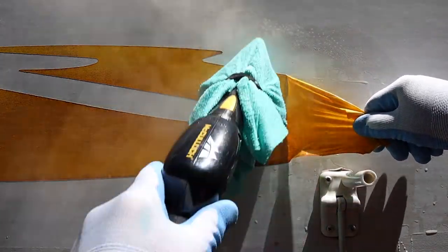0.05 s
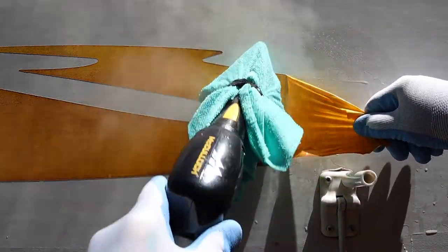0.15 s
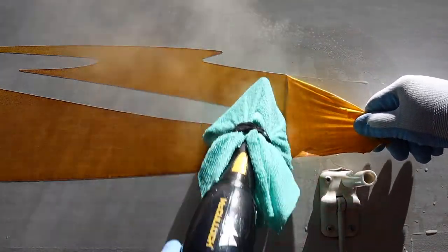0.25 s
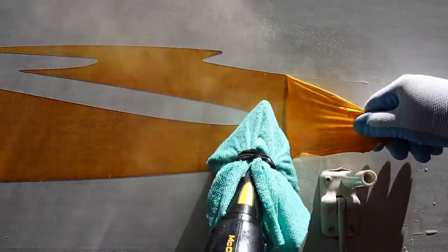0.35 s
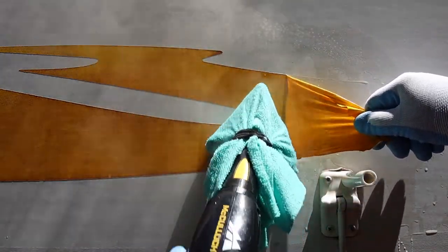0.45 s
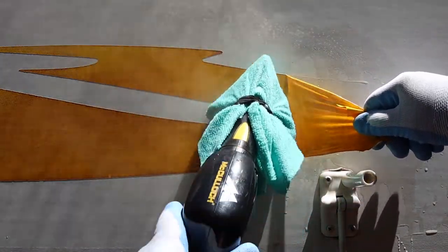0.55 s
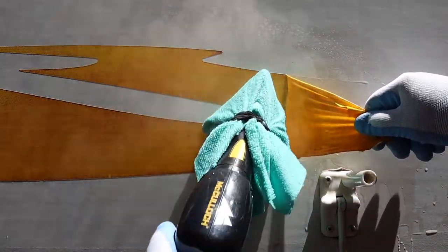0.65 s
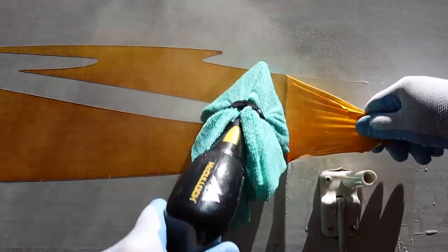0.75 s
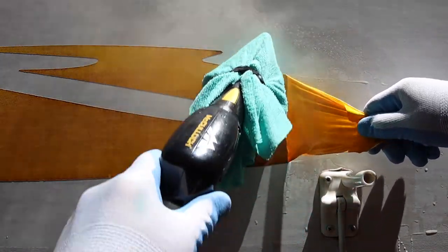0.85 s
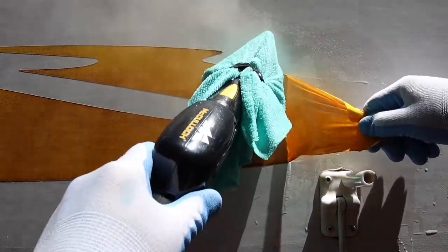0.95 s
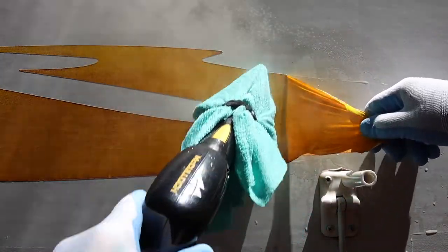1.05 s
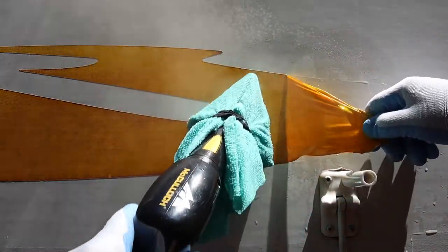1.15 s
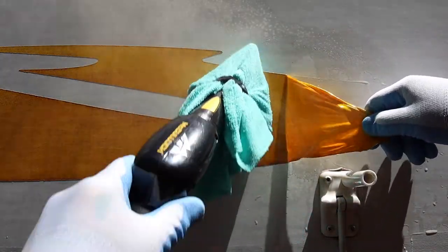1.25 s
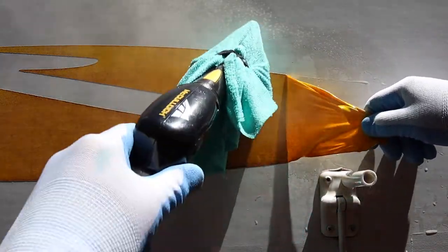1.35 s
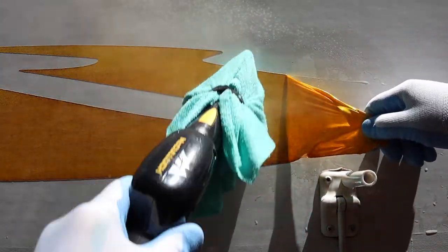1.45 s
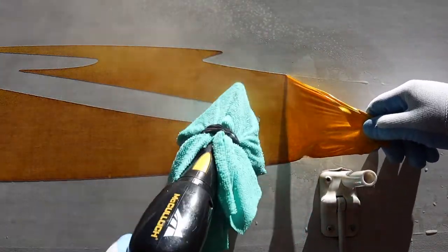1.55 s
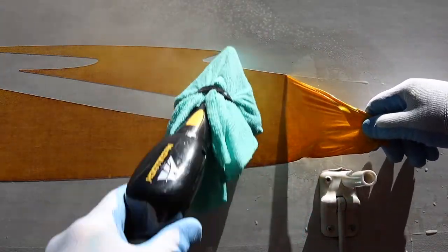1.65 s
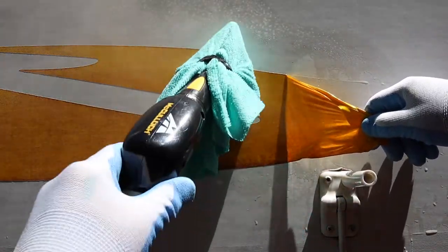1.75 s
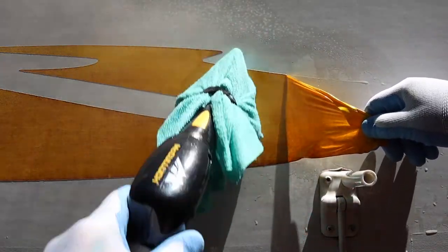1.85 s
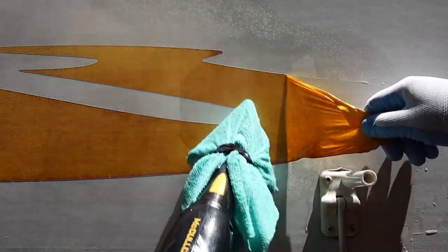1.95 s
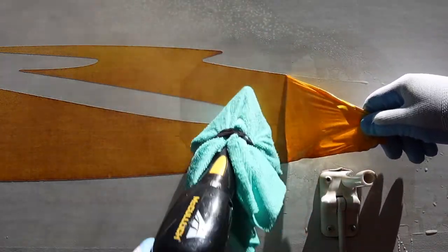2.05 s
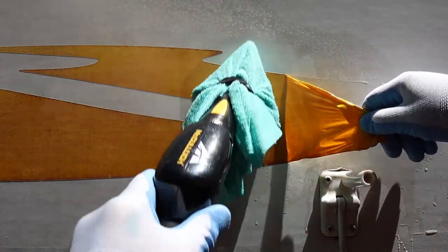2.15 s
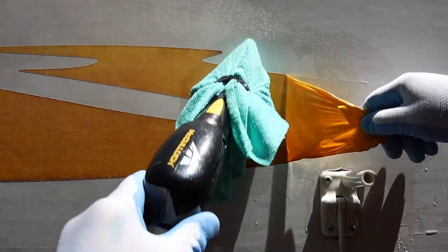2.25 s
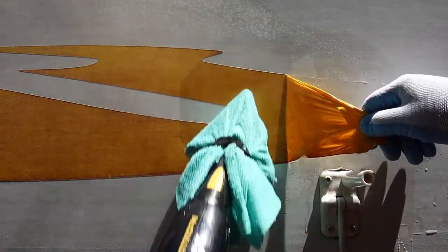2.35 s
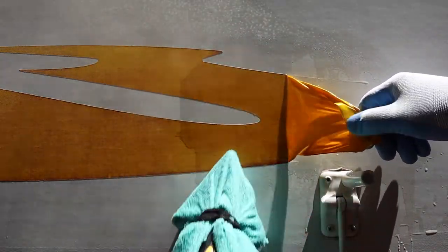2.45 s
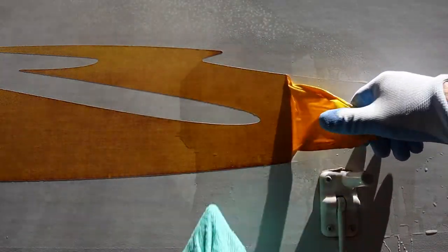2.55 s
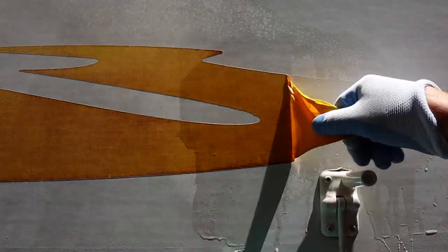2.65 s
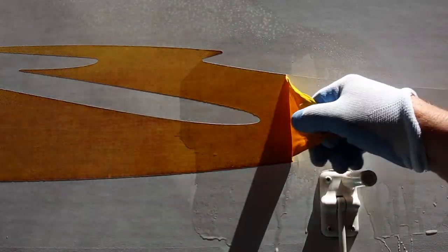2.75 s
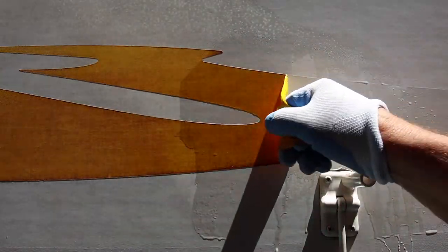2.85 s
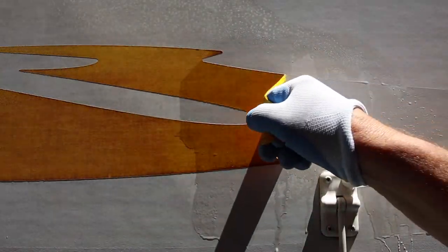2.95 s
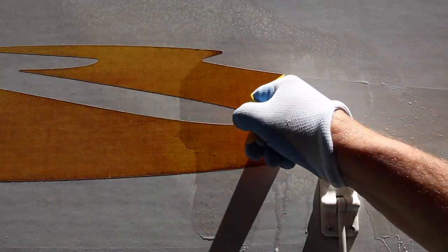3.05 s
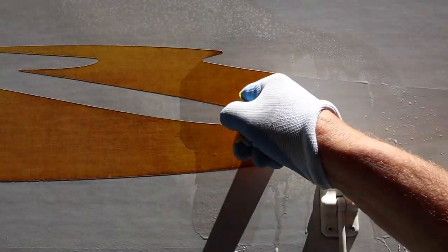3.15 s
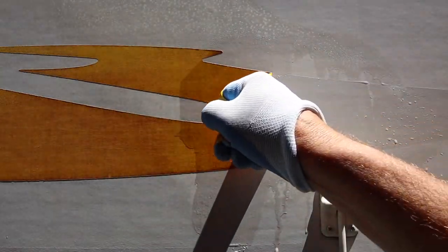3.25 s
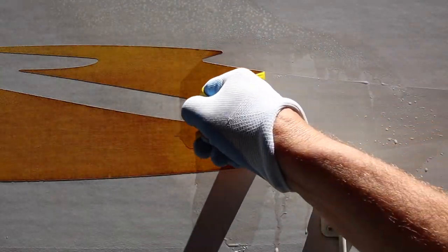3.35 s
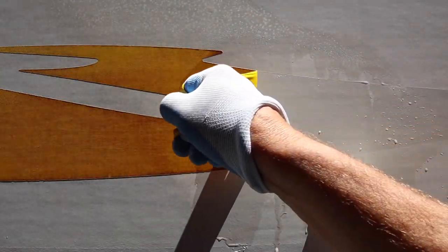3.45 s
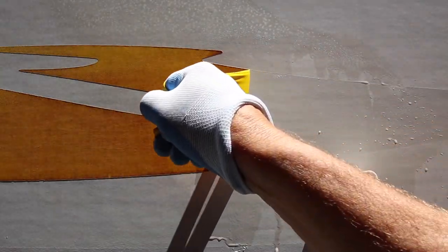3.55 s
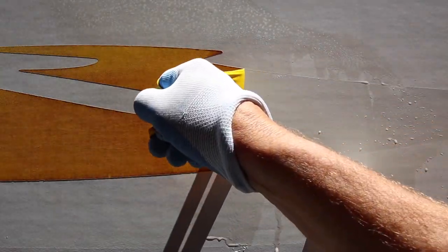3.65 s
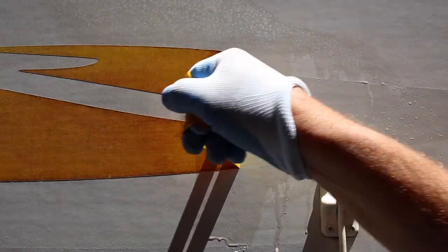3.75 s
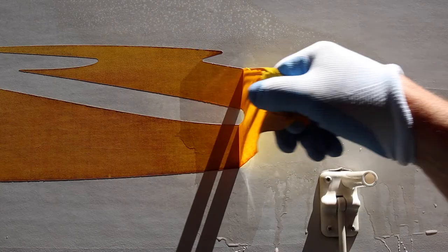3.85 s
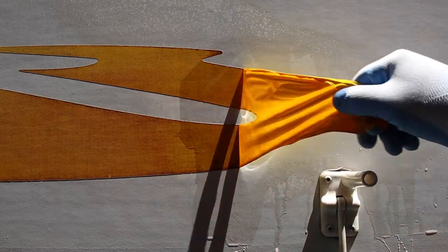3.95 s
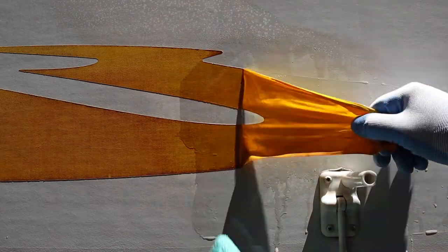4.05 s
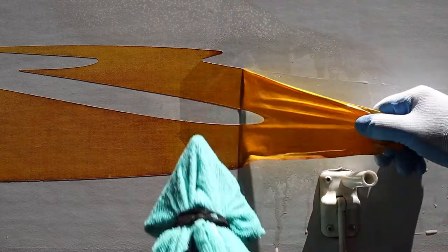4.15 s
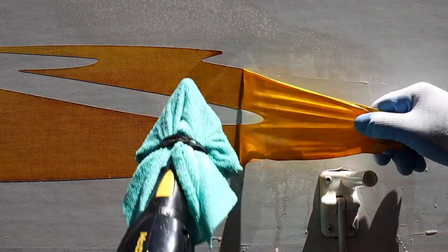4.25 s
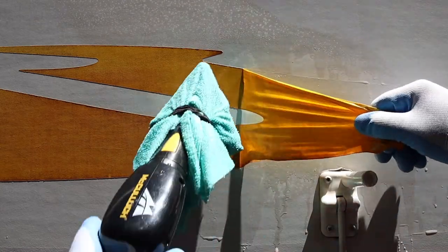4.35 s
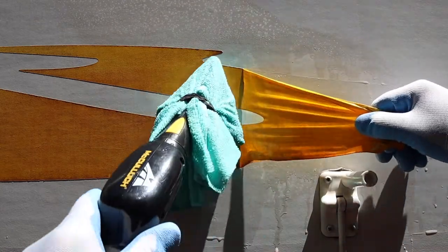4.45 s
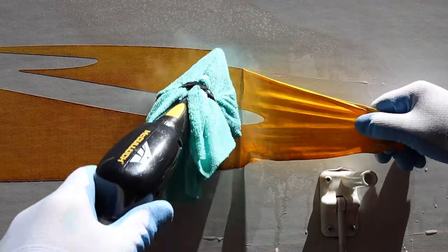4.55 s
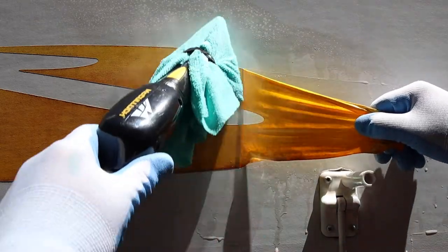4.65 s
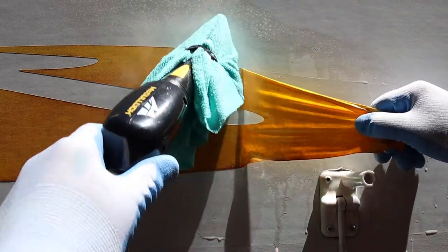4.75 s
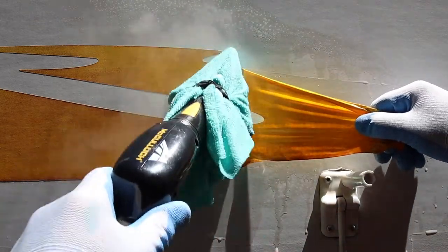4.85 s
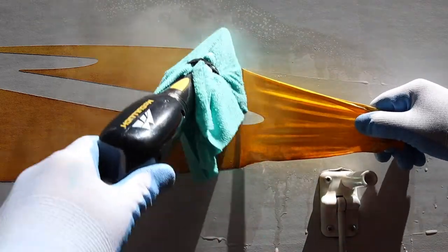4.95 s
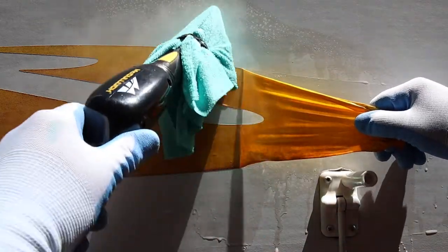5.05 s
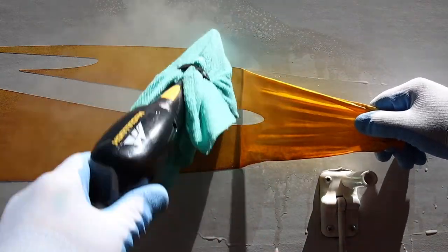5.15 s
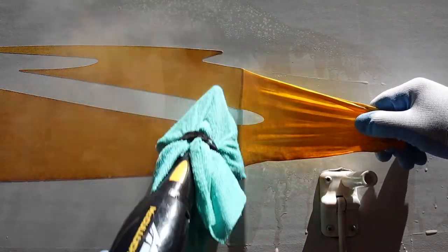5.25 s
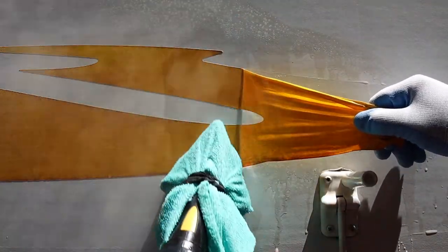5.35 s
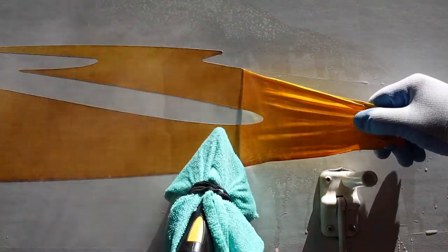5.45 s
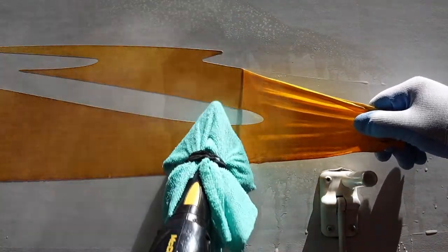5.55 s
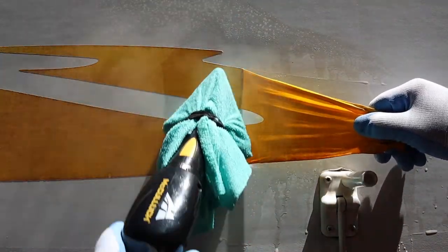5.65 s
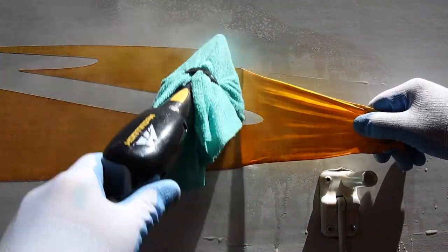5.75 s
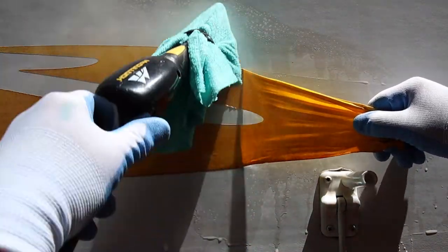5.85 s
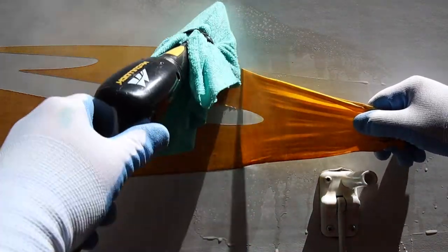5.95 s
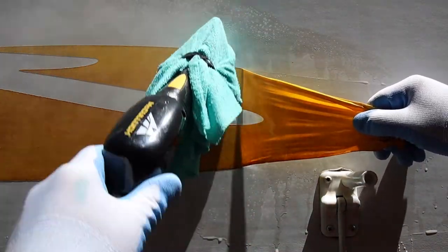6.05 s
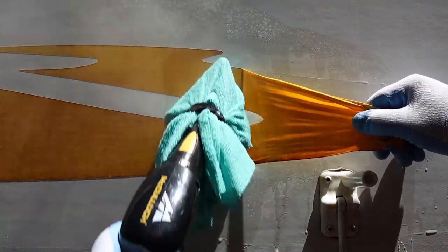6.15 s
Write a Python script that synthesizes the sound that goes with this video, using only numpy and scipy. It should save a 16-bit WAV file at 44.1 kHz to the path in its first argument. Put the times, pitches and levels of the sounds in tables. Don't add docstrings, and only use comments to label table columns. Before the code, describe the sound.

A hand-held steam nozzle wrapped in a towel hisses loudly and close, its tone shifting with each stroke. The valve shuts with a dull thump. Sticky film is peeled from a panel with sharp snaps, a hollow knock, faint creaks and rustles, over low wind buffets and a far outdoor hum. Then a second, bursting steam blast takes over until the end.

```python
import sys
import numpy as np
from scipy import signal
from scipy.fft import rfft, irfft, next_fast_len
from scipy.io import wavfile
from scipy.ndimage import uniform_filter1d, map_coordinates

SR = 44100
rng = np.random.default_rng(int(sys.argv[2]) if len(sys.argv) > 2 else 0)


def wrap_up_sound(samples):
    columns = np.atleast_2d(samples).T
    tamed = np.clip(columns, -1, 1)
    steps = np.round(tamed * 32767).astype(np.int16)
    wavfile.write(sys.argv[1], SR, steps)


def convert_level_to_amplitude(level_db):
    exponent = np.asarray(level_db, float) / 20
    return 10 ** exponent


N = 274302
T = np.arange(N) / SR
HIT_T = np.arange(SR // 5) / SR

# (time [s], travel [s])
VALVE_MOVES = [
    (2.474, 0.0082),
    (4.517, .006),
]
# (frequency [Hz], left-right likeness [-1..1])
DIFFUSE_ALIKE = [(200, 0.97), (1000, 0.82), (3000, .1), (10000, 0.026)]


def unit(x):
    return x / np.sqrt(np.mean(x ** 2) + 1e-20)


def along(points, hz):
    f, v = np.transpose(points)
    return np.interp(np.log(hz + 1), np.log(f + 1), v)


def curves(rows, t=T):
    s, *cols = np.transpose(rows)
    return [np.interp(t, s, c) for c in cols]


def wobble(rate):
    knots = rng.standard_normal(int(N * rate / SR) + 4)
    return map_coordinates(knots, [T * rate])


def bump(t, s, half):
    return np.exp(-((t - s) / half) ** 2)


def filtered(x, response):
    m = next_fast_len(N + SR // 2)
    return irfft(rfft(x, m) * response(np.fft.rfftfreq(m, 1 / SR)), m)[..., :N]


def resonant(x, peaks):
    def ring(f):
        return sum(convert_level_to_amplitude(db) * 1j * f * w / (c * c - f * f + 1j * f * w) for c, w, db in peaks)
    return filtered(x, lambda f: 1 + ring(f))


def rush(spectrum, alike, patchy_db, colour=lambda hz, t: 0):
    hz, t, z = signal.stft(rng.standard_normal((2, N)), SR, nperseg=512)
    field = uniform_filter1d(rng.standard_normal(z.shape[1:]), size=8, axis=0)
    field = uniform_filter1d(field, size=12, axis=1)
    patches_db = patchy_db * (1 + hz[:, None] / 7000) * unit(field)
    pair = signal.istft(z * convert_level_to_amplitude(patches_db + colour(hz, t)), SR, nperseg=512)[1][:, :N]

    def mid_side_response(f):
        turn = np.arccos(np.clip(along(alike, f), -1, 1)) / 2
        return convert_level_to_amplitude(along(spectrum, f)) * [np.cos(turn), np.sin(turn)]
    mid, side = filtered(pair, mid_side_response)
    return np.array([mid + side, mid - side]) / np.std(mid)


def add(track, s, sound):
    track[round(s * SR):][:len(sound)] += sound


def towel_colour(pressure):
    # (time [s], opening [dB])
    fold_opening = [(0.05, -0.5), (.28, 2.5), (.46, -0.5), (.72, 4), (.92, -4), (1.12, 2), (1.4, -4),
                    (1.6, 1), (1.77, -9), (2.03, 3), (2.22, -2.5), (2.41, 2), (4.74, -5), (4.89, 2),
                    (5.1, -6), (5.38, 4.5), (5.95, -5.5), (6.2, 2.5)]
    # (time [s], lift [dB], half length [s])
    edge_escapes = [(.1, 2, .08), (.33, 2.5, 0.07), (.6, 4, .1), (1.05, 5, .09), (1.57, 2, .05),
                    (1.92, 4.5, .06), (2.41, 3, .06), (4.87, 4.5, .07), (5.14, 7, 0.079), (5.44, 3, .1),
                    (5.68, 4.5, .07), (5.97, 8, .08)]
    body_opens, body_pressed, top_pressed = .25, -.4, -0.52
    burst_opens_db, burst_body_db, burst_s = 4.5, 2.5, .09

    def colour(hz, t):
        push = curves(pressure, t)[0]
        burst = bump(t, VALVE_MOVES[1][0], burst_s)
        folds = uniform_filter1d(curves(fold_opening, t)[0], size=12) + burst_opens_db * burst
        body = body_opens * folds + body_pressed * push + burst_body_db * burst
        top = sum(db * bump(t, s, half) for s, db, half in edge_escapes) + top_pressed * push
        bands = [c - np.mean(c) for c in (body, folds, top)]
        # body near 3.5 kHz, folds 6-8 kHz, top from 10 kHz
        shares = [along([(1800, 0.0027), (3500, k == 0), (6000, k == 1), (7800, k == 1), (9800, k == 2)], hz)
                  for k in range(3)]
        return np.transpose(shares) @ bands * np.array([1.1, .25])[:, None, None]
    return colour


def steam():
    # (start [s], end [s], level at start [dB], sag [dB/s])
    blasts = [
        (0, 2.1, -20.5, -.5),
        (4.5, 6.3, -18.5, -1.2),
    ]
    # (frequency [Hz], level [dB per Hz])
    jet_spectrum = [(120, -67.5), (200, -38.5), (326, -24.5), (404, -25.5), (623, -15), (682, -18),
                    (788, -9), (979, -7.5), (1400, -2.5), (2290, -6), (5150, -7.5), (8230, -21.5),
                    (11200, -11), (13200, -23.5), (14900, -39.5)]
    # (frequency [Hz], left-right likeness [-1..1])
    jet_alike = [(60, 0.93), (300, 1), (1500, 0.9), (3000, 0.77), (5500, 0.54), (7300, 0.016),
                 (8700, -0.35), (10500, -0.3), (14000, -0.4)]
    # (time [s], left over right [dB], lag of left [us])
    nozzle_place = [(0, -0.2, 22), (.6, -0.8, 29), (1.1, -0.2, 18), (1.7, 0, -6), (2.4, -0.5, 1),
                    (4.5, 0, -11), (5.3, 1, -9), (6.2, 1, -16)]
    surge_db, surge_s, drift_db = 4.5, 0.043, 0.15

    pressure = [(t, db + sag_db * (t - s)) for s, end, db, sag_db in blasts for t in (s, end)]
    (shut, closing), (opens, opening) = VALVE_MOVES
    gate = np.clip((shut - T) / closing, 0, 1) + np.clip((T - opens) / opening, 0, 1) ** 2
    sputter_db = .4 * wobble(17) + .5 * wobble(60) + 0.37 * wobble(300)
    surge = surge_db * np.exp(-np.abs(T - opens - .025) / surge_s) * (T > opens)
    level_db = curves(pressure)[0] + 1.68 + surge + drift_db * wobble(4.9) + sputter_db

    jet = rush(jet_spectrum, jet_alike, patchy_db=.85, colour=towel_colour(pressure))
    pan_db, lag_us = curves(nozzle_place)
    slope = filtered(jet.mean(0), lambda f: 2j * np.pi * f / (1 + (f / 7000) ** 4))
    side = np.array([[.5], [-.5]])
    return gate * convert_level_to_amplitude(level_db + side * pan_db) * (jet - side * lag_us / 1e6 * slope)


def blown_panel(jet):
    # (centre [Hz], width [Hz], lift [dB])
    blown_modes = [(316, 35, -6), (633, 23, -7), (783, 31, -2.5), (920, 23, -2.5), (1072, 26, -2),
                   (1389, 26, -4), (1530, 35, -6), (1687, 26, -2.5), (1820, 29, -5), (2010, 28, -7.5),
                   (2130, 12, -6), (2340, 18, -8.5), (3087, 30, -2.5), (3402, 41, -2.5)]
    return resonant(jet, blown_modes)


def panel(x):
    # (centre [Hz], width [Hz], lift [dB])
    panel_modes = [
        (1390, 5.7, -6),
        (1700, 9.7, -5),
        (2550, 12, -8),
    ]
    return resonant(x, panel_modes)


def surfaces(x):
    # (delay [ms], share [1])
    reflections = [(3.6, .15), (4.0, -0.08), (6.49, 0.095), (6.82, 0.0071), (7.3, -.08), (10.9, .08)]

    def comb(f):
        return sum(g * np.exp(-2j * np.pi * f * ms / 1000) for ms, g in reflections)
    return filtered(x, lambda f: 1 + comb(f) / (1 + (f / 3000) ** 4))


def yard(x):
    # (frequency [Hz], t60 [s])
    decay = [(150, 0.13), (1500, 0.24), (5000, 0.23), (11000, 0.17)]
    hz, t, z = signal.stft(rng.standard_normal((2, SR // 2)), SR, nperseg=256)
    turn = np.arccos(np.clip(along(DIFFUSE_ALIKE, hz), -1, 1))[:, None] / 2
    mid, side = np.cos(turn) * z[0], np.sin(turn) * z[1]
    z = np.array([mid + side, mid - side])
    tail = signal.istft(z * convert_level_to_amplitude(-60 * t / along(decay, hz)[:, None]), SR, nperseg=256)[1]
    late = np.pad(x, (150, 0))[None]
    return signal.fftconvolve(late, tail / np.linalg.norm(tail[0]), axes=1)[:, :N]


def wind():
    # (time [s], buffet [dB], upper rumble over it [dB])
    gusts = [(.5, -55, -4.5), (.82, -51.5, -10.5), (1.05, -53.5, -1.5), (1.42, -53, -9.5),
             (1.55, -46.5, -2), (1.67, -40.5, -22), (1.77, -42, -13), (1.97, -45, -2), (2.1, -47, -8.5),
             (2.22, -44, -8), (2.38, -47.5, -10), (2.98, -46, 6.5), (3.249, -33.5, -13), (3.34, -44.5, 2.5),
             (3.43, -40.5, -9), (3.55, -44, -6.5), (3.87, -46, -8), (4.02, -42, 2), (4.13, -52, 10.5),
             (4.3, -47.5, -7.5), (4.52, -47, 2), (4.8, -49, -9.5), (4.99, -46, 0.5), (5.28, -49, -4),
             (5.58, -47, -12.5), (5.68, -47, -11.5), (5.87, -55, -11.5), (6.1, -48, -4)]
    # (frequency [Hz], level [dB per Hz])
    buffet_spectrum = [(11, -41), (18, -1), (65, -1.5), (81, -8), (110, -11.5), (140, -41.5), (240, -120)]
    # (frequency [Hz], level [dB per Hz])
    rumble_spectrum = [(60, -41), (90, 0), (160, -1.5), (280, -20), (500, -54)]
    half_s, calm_db, calm_rumble_db = 0.038, -56.5, -60

    buffet = convert_level_to_amplitude(calm_db + 1.6 * wobble(9))
    buffet = buffet + sum(convert_level_to_amplitude(db) * bump(T, s, half_s) for s, db, _ in gusts)
    upper = convert_level_to_amplitude(calm_rumble_db + 1.3 * wobble(9.7))
    upper = upper + sum(convert_level_to_amplitude(db + up_db - 3.5) * bump(T, s, half_s) for s, db, up_db in gusts)
    low = buffet * rush(buffet_spectrum, [(30, 0.99)], patchy_db=0.9)
    return low + upper * rush(rumble_spectrum, [(100, 0.93)], patchy_db=1.0)


def hum():
    # (frequency [Hz], level [dB per Hz])
    hum_spectrum = [(120, -31), (200, -3), (291, -7.5), (430, -6.5), (670, -11), (890, -6), (1270, -13.5),
                    (1660, -15), (5460, -29), (11900, -39), (14000, -59.5)]
    # (frequency [Hz], left-right likeness [-1..1])
    hum_alike = [(60, 0.93), (180, 1), (540, 0.44), (1610, -0.54), (4830, -0.37), (14500, -0.5)]
    ducked_db = -3.5 * np.exp(-np.abs(T - VALVE_MOVES[0][0]) / .45)
    return convert_level_to_amplitude(-54.5 + ducked_db + 0.73 * wobble(3)) * rush(hum_spectrum, hum_alike, patchy_db=0.4)


def panel_notes(track):
    # (time [s], peak [dB], frequency [Hz], t60 [s])
    hanging = [
        (2.468, -30, 1390, .14),
        (2.468, -36, 1730, 0.3),
        (2.962, -41, 1402, .25),
        (2.962, -42, 1720, .25),
    ]
    for s, db, hz, t60 in hanging:
        tone = np.sin(2 * np.pi * hz * HIT_T) * (1 - np.exp(-HIT_T / .004))
        add(track, s, convert_level_to_amplitude(db - 60 * HIT_T / t60) * tone)


def thuds(track):
    # (time [s], peak [dB], frequency [Hz], t60 [s])
    thumps = [
        (2.4734, -19.5, 252, 0.017),
        (2.9589, -26, 190, .05),
        (2.9624, -31, 340, 0.032),
        (4.123, -36, 126, 0.16),
        (4.122, -35.5, 340, 0.11),
        (4.516, -24, 240, 0.027),
    ]
    for s, db, hz, t60 in thumps:
        tone = np.sin(2 * np.pi * hz * HIT_T * np.exp(-HIT_T / 0.21))
        add(track, s, convert_level_to_amplitude(db - 60 * HIT_T / t60) * tone)


def film_ring(hz, cycles):
    return np.sin(2 * np.pi * hz * HIT_T) * np.exp(-HIT_T * hz / cycles) * (1 - np.exp(-HIT_T / 0.000067))


def snaps(track):
    # (time [s], peak [dB], ring [Hz], sheet body [dB])
    film_snaps = [(2.666, -43, 4000, -3), (2.669, -43.5, 2500, 11), (2.6814, -47.5, 7500, -5),
                  (2.6907, -48, 2850, 3), (2.722, -19.5, 5000, -15), (2.731, -33.5, 10500, -12),
                  (2.734, -36, 4670, 5), (2.7395, -33, 7050, -3), (2.925, -54, 4500, -4),
                  (2.9588, -16, 4030, 3.5), (2.9605, -21.5, 4930, -2), (3.7453, -52, 4450, -9),
                  (3.7693, -48, 2300, -5), (3.8894, -41, 3500, -7), (3.952, -36, 4200, -15),
                  (4.0781, -37.5, 8850, -12), (4.112, -35.5, 8500, -6), (4.117, -33, 2700, -15),
                  (4.1193, -19.5, 6550, -10.5), (4.129, -35.5, 5000, -6), (4.138, -36, 4500, -3),
                  (4.1538, -39.5, 5000, -8), (4.16, -37.5, 2790, -9), (4.1694, -38, 3200, 2),
                  (4.2002, -44.5, 8500, -13), (4.2494, -54.5, 6000, -6), (4.303, -31.5, 4640, -9),
                  (4.3104, -37.5, 6000, -0.5)]
    for s, db, hz, body_db in film_snaps:
        crack = 0.45 * rng.standard_normal(len(HIT_T)) * convert_level_to_amplitude(-60 * HIT_T / 0.0045)
        body = convert_level_to_amplitude(body_db) * film_ring(1560, cycles=0.67)
        push = convert_level_to_amplitude(-53 + 3.5 + .4 * (db + 39)) * film_ring(330, cycles=0.5)
        add(track, s + .0007, convert_level_to_amplitude(db + 4.0) * (film_ring(hz, cycles=1.25) + crack - body) + push)


def creaks(track):
    # (time [s], peak [dB], frequency [Hz])
    slips = [(2.815, -47, 1970), (2.8844, -51, 1800), (3.9275, -45, 1550), (3.9789, -41, 1420),
             (3.9994, -48, 1670), (4.029, -42, 1690), (4.0384, -46, 1610), (4.0487, -46, 1770),
             (4.0624, -49, 1700), (4.0736, -46, 1680)]
    for s, db, hz in slips:
        add(track, s, convert_level_to_amplitude(db + 4.0) * film_ring(hz, cycles=3.2))


def struck():
    track = np.zeros(N)
    for layer in (panel_notes, thuds, snaps, creaks):
        layer(track)
    return filtered(track, lambda f: 1 / (1 + 1j * f / 8000) / (1 + (f / 13800) ** 12))


def peel():
    # (time [s], rustle [dB], rise [s per 20 dB], fall [s per 20 dB])
    tugs = [(2.67, -55.5, .008, .12), (2.735, -47, .01, .04), (2.93, -69, .1, .05), (3.79, -60.5, .05, .1),
            (3.865, -48, 0.11, 0.05), (3.955, -47, .05, 0.089), (3.985, -48.5, .05, .11),
            (4.125, -43, 0.032, 0.067), (4.205, -58.5, .03, 0.03), (4.315, -51, .012, .015),
            (4.47, -60.5, .04, .3)]
    # (frequency [Hz], level [dB per Hz])
    film_spectrum = [(410, -42), (700, -10), (827, -7), (1230, -13), (1500, -5.5), (3500, -4), (9000, -7),
                     (13000, -11.5), (14900, -32)]
    # (frequency [Hz], left-right likeness [-1..1])
    film_alike = [(60, 0.91), (240, 0.72), (930, -0.21), (3670, -0.19), (14500, -0.87)]
    level = sum(convert_level_to_amplitude(db - 20 * np.where(T < s, (s - T) / rise, (T - s) / fall)) for s, db, rise, fall in tugs)
    grains = convert_level_to_amplitude(4.5 * wobble(700) + .7 * wobble(82))
    return level * convert_level_to_amplitude(6.0) * unit(grains * rush(film_spectrum, film_alike, patchy_db=1.3))


def knock():
    # (level [dB rms], t60 [s], dull above [Hz])
    strike = (-32, .21, 1500)
    db, t60, dull_hz = strike
    s = 2.9595
    spectrum = [(120, -30), (250, 0), (dull_hz, -3), (4000, -13), (12000, -30)]
    age = np.clip(T - s, 0, None)
    return (T > s) * convert_level_to_amplitude(db - 60 * age / t60) * rush(spectrum, DIFFUSE_ALIKE, patchy_db=1.5)


def scene():
    jet, film = blown_panel(steam()), struck()
    hand = film * convert_level_to_amplitude([[-.6], [.6]]) + peel() + knock()
    far = convert_level_to_amplitude(-11.0) * jet.mean(0) + convert_level_to_amplitude(-5.5) * film
    far = filtered(far, lambda f: 1 / (1 + 1j * f / 3500))
    return surfaces(panel(jet + hand)) + yard(far) + wind() + hum()


def low_pass(x):
    return signal.sosfilt(signal.butter(12, 15080, fs=SR, output="sos"), x)


def record(dry):
    # (frequency [Hz], left over right [dB])
    port_balance = [(60, -1), (130, -1), (290, -0.5), (630, 0), (1380, -3), (3020, -3.5), (6610, 0),
                    (14500, -2.5)]
    side = np.array([[.5], [-.5]])
    mix = np.clip(filtered(dry, lambda f: convert_level_to_amplitude(along(port_balance, f) * side)), -1, 1)
    return low_pass(mix)


dry = scene()
out = record(dry)
wrap_up_sound(out)
```